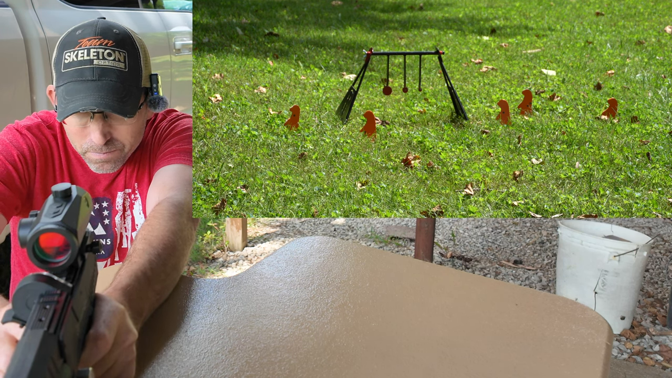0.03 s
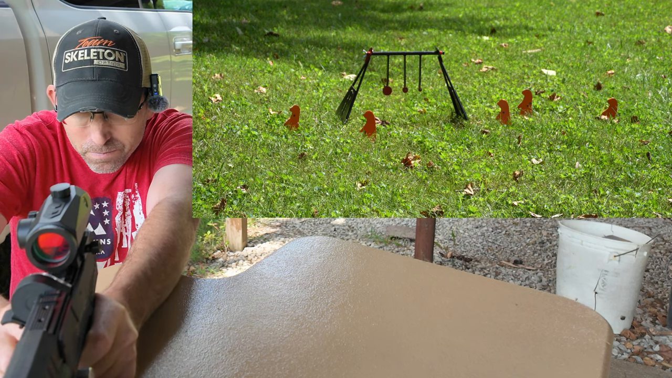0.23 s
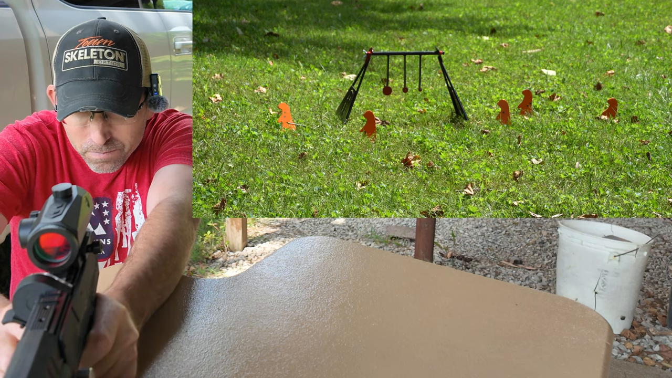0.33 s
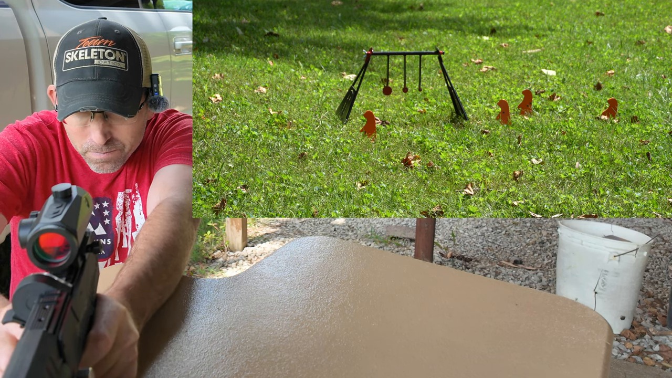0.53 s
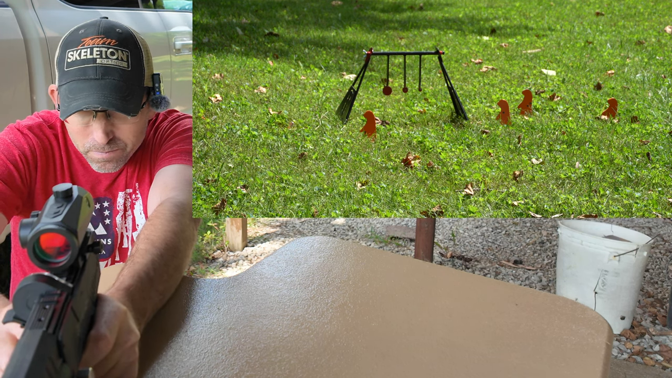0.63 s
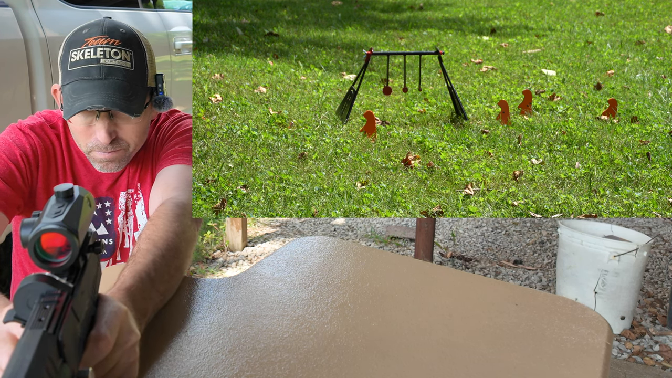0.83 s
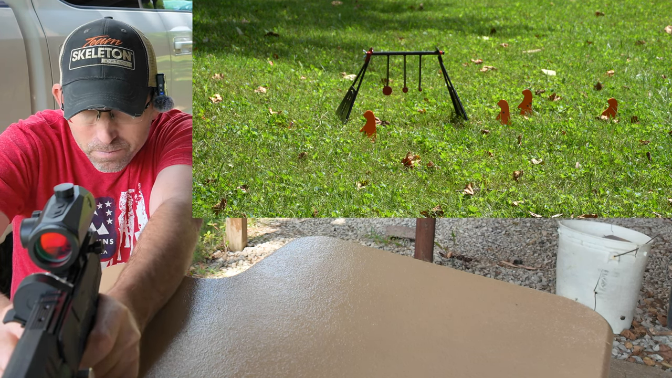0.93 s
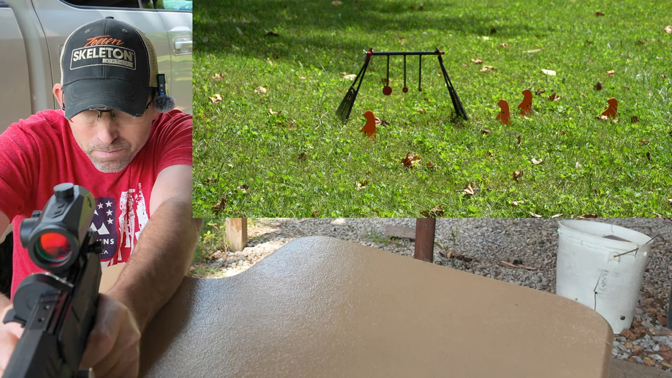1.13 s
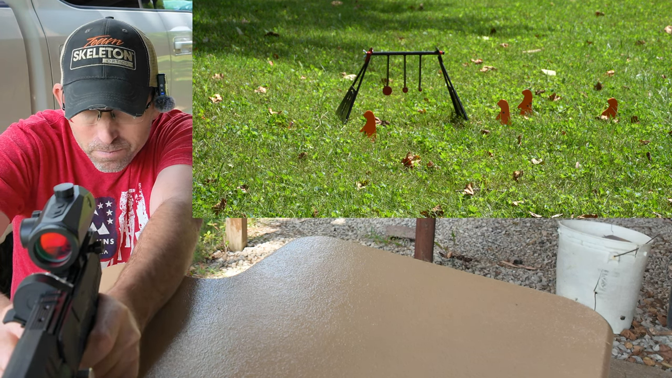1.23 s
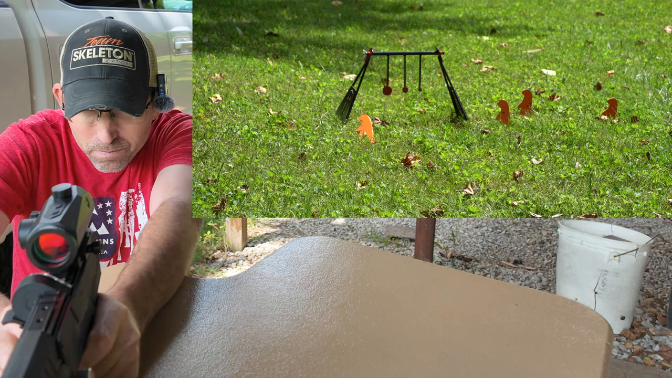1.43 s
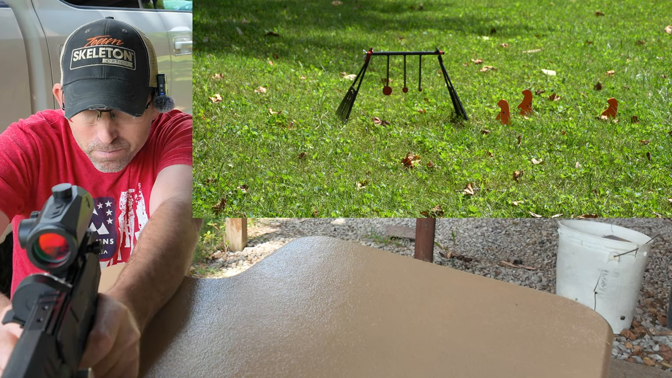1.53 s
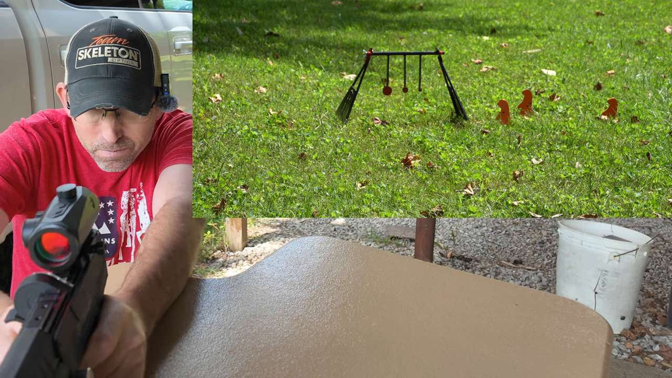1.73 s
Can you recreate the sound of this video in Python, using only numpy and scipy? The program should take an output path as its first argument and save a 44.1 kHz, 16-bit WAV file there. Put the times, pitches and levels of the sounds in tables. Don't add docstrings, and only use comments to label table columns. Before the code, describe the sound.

Gas pistol pops twice with clacking slide, pellets cracking and ringing thin steel plates on a lawn

```python
import sys
import numpy as np
from scipy import signal
from scipy.io import wavfile
from scipy.ndimage import uniform_filter1d

SR = 44100
rng = np.random.default_rng(int(sys.argv[2]) if len(sys.argv) > 2 else 0)


def wav_out(sig):
    wavfile.write(sys.argv[1], SR, np.round(np.clip(np.atleast_2d(sig).T, -1, 1) * 32767).astype(np.int16))


def ratio_of_db(decibels):
    return 10 ** (np.asarray(decibels, float) / 20)


N = 79380
SIDES = np.array([[.5], [-.5]])
METAL_WIDTH = 0.54


def evened(x):
    return x / np.sqrt(np.mean(x ** 2) + 1e-20)


def read(points, hz):
    f, value = np.transpose(points)
    return np.interp(np.log(hz + 1), np.log(f + 1), value)


def add(mix, s, sound):
    part = mix[..., round(s * SR):][..., :sound.shape[-1]]
    part += sound[..., :part.shape[-1]]


def band(x, hz, width_hz):
    b, a = signal.iirpeak(min(hz, SR / 2.2), hz / width_hz, SR)
    return signal.lfilter(b, a, x)


def band_twice(x, hz, width_hz):
    return band(band(x, hz, width_hz), hz, width_hz)


def metal_noise(length):
    middle, side = rng.standard_normal((2, length))
    return middle + METAL_WIDTH * side * np.array([[1], [-1]])


# (frequency [Hz], likeness [0-1])
COHERENCE = [(60, 1), (240, 0.96), (950, 1.0), (3770, 0.95), (15000, 0.64)]


def bed(colour):
    frames, hz = N // 256 + 5, np.fft.rfftfreq(1024, 1 / SR)
    a, b, c, d, patches = rng.standard_normal((frames, 513, 5)).T
    patches = uniform_filter1d(patches, size=10, axis=0)
    patches = evened(uniform_filter1d(patches, size=10, axis=1))
    same = np.clip(read(COHERENCE, hz), 0, 1)[:, None]
    left = a + 1j * b
    right = same * left + np.sqrt(1 - same ** 2) * (c + 1j * d)
    level_db = read(colour, hz)[:, None] + 0.5 * patches
    noise = signal.istft(np.array([left, right]) * ratio_of_db(level_db), nperseg=1024, noverlap=768)[1]
    return evened(noise[:, :N])


# (frequency [Hz], level [dB])
AIR_COLOUR = [(24, -47), (40, -14), (133, -1.5), (290, -12.5), (542, -19), (600, -16.5), (3740, -17.5),
              (5720, -30), (16000, -40.5)]
# (frequency [Hz], level [dB])
HUM_COLOUR = [(24, -67.5), (40, -24.5), (75, -0.5), (275, -14), (452, -7.5), (495, -11), (650, -7),
              (9000, -36.5), (11700, -66.5), (19800, -120)]
# (time [s], level [dB])
HUM_DRIFT = [
    (0, -11.5),
    (0.246, -9.5),
    (0.7, -12.5),
    (1.001, -18.5),
    (1.8, -11.5),
]
AIR_DB, HUM_DB, INSECT_DB = -68.5, -50, -71
INSECT_HZ, INSECT_WIDTH_HZ = 5930, 1600


def background():
    drift = ratio_of_db(np.interp(np.arange(N) / SR, *np.transpose(HUM_DRIFT)))
    insects = rng.standard_normal((2, N))
    insects = band_twice(insects + 1.3 * insects[::-1], INSECT_HZ, INSECT_WIDTH_HZ)
    air = ratio_of_db(AIR_DB) * bed(AIR_COLOUR)
    hum = ratio_of_db(HUM_DB) * drift * bed(HUM_COLOUR)
    return air + hum + ratio_of_db(INSECT_DB) * evened(insects)


def burst(db, hz, width_hz, length):
    u = np.arange(4096) / SR / length
    rattle = metal_noise(4096) * u * np.exp(-2 * u ** 4.26)
    return ratio_of_db(db) * np.sqrt(SR / width_hz) * band_twice(rattle, hz, width_hz)


def beating(hz, db, t60, split_hz):
    t = np.arange(SR) / SR
    mode = np.sin(2 * np.pi * hz * t)
    upper = 0.85 * np.sin(2 * np.pi * (hz + split_hz) * t)
    lower = 0.55 * np.cos(2 * np.pi * (hz - 0.12 * split_hz) * t)
    return ratio_of_db(db - 60 * t / t60) * (mode + upper + lower)


# (time [s], level [dB], sear tick lift [dB], pop lift [dB])
SHOTS = [
    (0.2407, -2.5, 5, 4),
    (1.3443, -3, 12, 4.5),
]
# (delay [s], level [dB], centre [Hz], width [Hz], length [s])
ACTION = [(-.0038, -21, 4300, 2500, .0009), (-.0012, -16, 3700, 3000, .002), (0, -24, 14500, 3000, .0015),
          (.0068, -10, 3400, 2500, .003), (.0095, -4, 4700, 2200, .002), (.0088, -14, 11500, 6000, .0018),
          (.0138, -12, 8000, 2500, .002), (.0156, -11, 6200, 2500, .002), (.0175, -8, 4100, 3200, .0026),
          (.0168, -17, 10000, 3000, .002), (.002, -14, 4000, 6000, .005), (.0200, -23, 5000, 7000, .02),
          (.008, -28, 12000, 8000, .055)]
# (delay [s], level [dB])
THUDS = [
    (0, -32.5),
    (.011, -27),
    (.040, -37),
    (.056, -31.5),
]
# (frequency [Hz], level [dB], t60 [s], partner split [Hz])
BENCH_MODES = [(341.8, -3.5, 0.27, 13), (585, -4.5, 0.017, 29), (474, -7, 0.056, 8.7),
               (1310, -12.5, 0.0065, 55), (767, -9.5, 0.094, 69)]
# (delay [s], frequency [Hz], level [dB], t60 [s], partner split [Hz])
DEEP_MODES = [(.012, 130, -55, 2.2, 13), (.002, 198, -35, .36, 10), (.002, 194, -52, 1.2, 7),
              (0, 95, -37, .07, 10), (.003, 275, -50, .12, 20), (.052, 272, -38, .13, 21)]
POP_DB, POP_S, POP_SIDE = -6.5, .00015, -0.98
POP_ECHO_S, POP_ECHO = .0018, .45


def pistol():
    out = np.zeros((2, N))
    u = np.arange(600) / SR / POP_S
    pop = ratio_of_db(POP_DB) * u ** 2 * (2.6 - u) * np.exp(-u * 0.92)
    pop = pop + SIDES * POP_SIDE * band(pop, 1650, 1400)
    ring = sum(beating(*mode) for mode in BENCH_MODES)
    for s, db, sear_db, pop_db in SHOTS:
        add(out, s, ratio_of_db(db + pop_db) * pop)
        add(out, s + POP_ECHO_S, ratio_of_db(db) * POP_ECHO * pop)
        for delay, thud_db in THUDS:
            add(out, s + delay, ratio_of_db(db + thud_db) * ring)
        for delay, *mode in DEEP_MODES:
            add(out, s + delay, ratio_of_db(db) * beating(*mode))
        for k, (delay, part_db, hz, width_hz, length) in enumerate(ACTION):
            part_db = part_db + sear_db * (k < 2)
            add(out, s + delay, burst(db + part_db, hz, width_hz, length))
    return out


# (frequency [Hz], t60 [s])
YARD_DECAY = [(100, .4), (500, .5), (2000, .5), (5000, .43), (8000, .25), (11000, .18), (15000, .14)]


def yard(x):
    taps = rng.standard_normal((2, SR))
    hz, t, z = signal.stft(taps, SR, nperseg=256)
    wide = np.clip(hz / 3500, 0, .35)[:, None]
    z = z[0] + wide * z[1] * np.array([1, -1])[:, None, None]
    decay = ratio_of_db(-60 * t / read(YARD_DECAY, hz)[:, None])
    tail = signal.istft(z * decay, SR, nperseg=256)[1]
    tail = tail * np.clip(np.arange(tail.shape[1]) / SR / 0.0033, 0, 1)
    tail = tail / np.linalg.norm(tail[0])
    return signal.fftconvolve(x.mean(0)[None], tail, axes=1)[:, :N]


STRIKE_S = [
    .3080,
    1.4117,
]
# (crack level [dB], scatter level [dB], scatter t60 [s], sheen level [dB], sheen t60 [s])
STRIKES = [
    (4.5, -25, 0.3, -23, 0.22),
    (5, -20, 0.44, -22, 0.3),
]
SHEEN_HZ = [12000, 10200]
CRACK_HZ, CRACK_S = 6500, .00022
SCATTER_TOP_HZ = 8500


def strikes():
    out, t = np.zeros((2, N)), np.arange(SR // 2) / SR
    low_pass = signal.butter(4, SCATTER_TOP_HZ, fs=SR, output="sos")
    for s, sheen_hz, row in zip(STRIKE_S, SHEEN_HZ, STRIKES):
        crack_db, scatter_db, scatter_t60, sheen_db, sheen_t60 = row
        crack = np.cos(2 * np.pi * CRACK_HZ * t) * np.exp(-t / CRACK_S)
        crack = crack + .5 * rng.standard_normal(len(t)) * np.exp(-t / 0.00097)
        grit = metal_noise(len(t))
        scatter = band(band(band(grit, 4500, 7000), 3900, 10000), 5500, 7000)
        scatter = signal.sosfilt(low_pass, scatter * ratio_of_db(scatter_db - 60 * t / scatter_t60))
        sheen = band_twice(grit, sheen_hz, 5000) * ratio_of_db(sheen_db - 60 * t / sheen_t60)
        add(out, s, ratio_of_db(crack_db) * band(crack, 6940, 15000) + scatter + sheen)
    return out


def plate(start, faces, tones):
    t = np.arange(N - round(start * SR)) / SR
    now, out = t + start, 0
    smooth = lambda v: uniform_filter1d(v, size=400, mode="nearest")
    for hz, (lift_db, face) in faces:
        s, db, pan_db = np.transpose(face)
        free_decay_db = 60 * np.maximum(now - s[-1], 0) / 0.126
        db = lift_db + np.interp(now, s, db) - free_decay_db
        pan_db = np.interp(now, s, pan_db)
        level = np.sqrt(2) * ratio_of_db(smooth(db) + SIDES * smooth(pan_db))
        out = out + level * np.sin(2 * np.pi * hz * t)
    for hz, (db, t60, edge, turn) in tones:
        lobe = np.hypot(0.3, np.sin(np.pi * (t - edge + .004 * SIDES) / turn))
        level = ratio_of_db(db - 60 * t / t60 + SIDES * 3.5)
        out = out + level * lobe * np.sin(2 * np.pi * hz * t + SIDES)
    mix = np.zeros((2, N))
    add(mix, start, out * np.minimum(t / 0.0018, 1))
    return mix


# (lift [dB], rows of (time [s],
# level [dB], left-right difference [dB]))
FACE_A = [
    (0.0013, [(.308, -19, 5.5), (.328, -10, 4.5), (.368, -18, 4.5), (.392, -15, 8.5), (.428, -27.5, 7.5), (.455, -22.5, 9.5), (.505, -28, 6), (.54, -44, 1), (.562, -44, 10)]),
          (5, [(0.309, -22, -2), (0.321, -28.5, 6), (0.361, -35.5, 6), (0.395, -53.5, -19.5), (0.463, -51.5, 11.5), (0.487, -67, 13.5), (0.509, -62.5, -9.5), (0.591, -85, 4), (0.66, -87.5, 2)]),
    (5, [(0.309, -28, 1.0), (0.323, -34.5, 1.5), (0.341, -41, 4.8), (0.447, -57.5, 3.5), (0.579, -88.5, 3.41), (0.62, -87.5, 2.6)]),
    (5, [(0.309, -39, 13), (0.333, -31, 4.5), (0.415, -67, 14), (0.437, -60, 2), (0.53, -83, 4.5)]),
]
FACE_B = [
    (0, [(1.412, -20.5, 6.2), (1.428, -14.5, 10.8), (1.455, -25.5, 6.9), (1.5, -28.5, 4.6), (1.525, -30.5, 22.3), (1.6, -39.5, 7.7), (1.625, -49.5, 1.23), (1.69, -59.5, 30), (1.76, -58.5, 7)]),
    (0, [(1.412, -43, 2), (1.433, -27, 18), (1.45, -24.5, 11), (1.482, -17.5, -4.5), (1.508, -42, -26), (1.525, -29, 4.5), (1.568, -54, 7), (1.605, -46, 8), (1.765, -69.5, 5.5)]),
          (6.8, [(1.412, -32, 8), (1.426, -30.5, 8), (1.466, -36.5, 3.5), (1.496, -46, 3), (1.534, -72, 5), (1.576, -62, 8), (1.614, -87, -3), (1.68, -92, 2.0)]),
    (2.1, [(1.412, -37, -3), (1.426, -26, 14), (1.452, -57, 13), (1.474, -30, 12), (1.496, -42.5, 14), (1.524, -52.5, 24), (1.6, -64, 15), (1.79, -80, 18)]),
    (2.5, [(1.412, -33, 0.5), (1.506, -42, 4.1), (1.7, -75, 6.1)]),
    (3.5, [(1.412, -30, 1.0), (1.424, -34.5, 4.1), (1.61, -60.5, 4.4), (1.7, -65, 3.5)]),
]
FACE_HZ_A = [6978, 8915, 9737, 12042]
FACE_HZ_B = [7509, 9207, 13257, 5286, 6097, 6430]
# (level [dB], t60 [s], edge-on after [s], half turn [s])
TONES_A = [(-27, .27, .04, .07), (-29, .48, .085, .13), (-28, .5, .085, .09), (-26, .3, .04, .1),
           (-36, .15, .05, .1), (-39, .4, .06, .1), (-39, .27, .06, .1), (-31, .22, .03, .08),
           (-39, 1.2, .352, .16)]
TONES_B = [(-30, .3, .06, .1), (-32, .3, .05, .1), (-40, .4, .06, .1), (-44, .3, .06, .1),
           (-32, .32, .08, .1), (-36, .2, .04, .08), (-25, .24, .068, .09)]
TONES_HZ_A = [2842, 4834, 6029, 6386, 10630, 13110, 13750, 14460, 6986]
TONES_HZ_B = [2795, 9245, 9900, 12090, 13578, 14170, 14890]


def plates():
    first = plate(STRIKE_S[0], zip(FACE_HZ_A, FACE_A), zip(TONES_HZ_A, TONES_A))
    second = plate(STRIKE_S[1], zip(FACE_HZ_B, FACE_B), zip(TONES_HZ_B, TONES_B))
    return first + second


KNOCK_S = [
    .4503,
    .894,
    1.456,
    1.511,
]
# (level [dB], centre [Hz], width [Hz], length [s])
KNOCKS = [
    (-25, 7000, 9000, .001),
    (-57, 1300, 1200, .003),
    (-22, 2900, 2400, .008),
    (-24, 3500, 2400, .003),
]
# (frequency [Hz], level [dB], t60 [s])
CLACK = [(2990, -18, .013), (3760, -17, .012), (4510, -19, .014), (1300, -30, .012)]
CLACK_S, CLACK_RISE_S = .4499, .0004


def knocks():
    out = np.zeros((2, N))
    for s, row in zip(KNOCK_S, KNOCKS):
        add(out, s, burst(*row))
    t = np.arange(2000) / SR
    clack = sum(ratio_of_db(db - 60 * t / t60) * np.sin(2 * np.pi * hz * t) for hz, db, t60 in CLACK)
    add(out, CLACK_S, clack * np.minimum(t / CLACK_RISE_S, 1))
    return out


def scene():
    gun, hits, rings = pistol(), strikes(), plates()
    to_yard = ratio_of_db(-4.5) * (gun + ratio_of_db(-3) * hits) + ratio_of_db(-27) * rings
    return gun + hits + rings + knocks() + yard(to_yard) + background()


# (frequency [Hz], level [dB])
GATE = [(7000, -72), (7600, -47), (11000, -46), (12500, -44), (15000, -43), (16000, -30)]


def gate(x):
    hz, t, z = signal.stft(x, SR, nperseg=1024)
    power = abs(z[0]) ** 2 + abs(z[1]) ** 2
    floor = power.max(0) * ratio_of_db(2 * read(GATE, hz))[:, None]
    local = uniform_filter1d(power, size=3, axis=0)
    passed = local ** 2 / (local ** 2 + floor ** 2 + 1e-40)
    return signal.istft(z * passed, SR, nperseg=1024)[1][:, :N]


def band_limit(x):
    return signal.sosfilt(signal.butter(12, 16650, fs=SR, output="sos"), x)


def record(dry):
    x = signal.sosfilt(signal.butter(2, 70, "high", fs=SR, output="sos"), dry)
    treble_limit = signal.firwin(255, 16100, window=("kaiser", 9), fs=SR)
    x = signal.oaconvolve(np.clip(x, -1, 1), treble_limit[None], "same")
    return band_limit(np.clip(gate(x), -1, 1))


dry = scene()
out = record(dry)
wav_out(out)
```